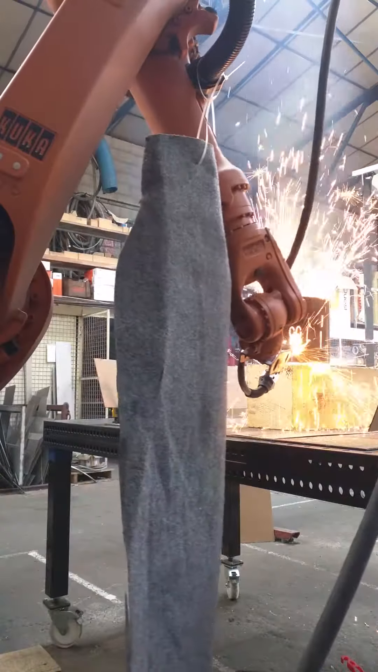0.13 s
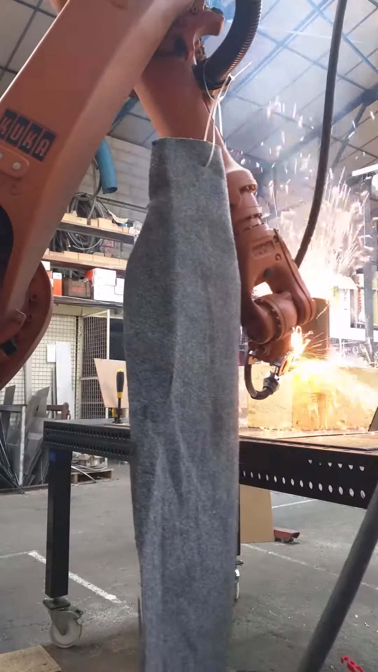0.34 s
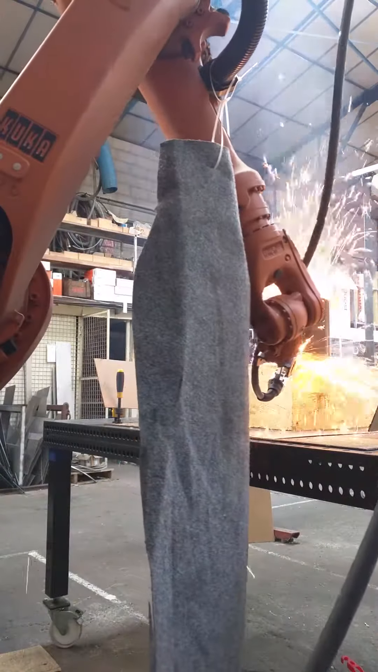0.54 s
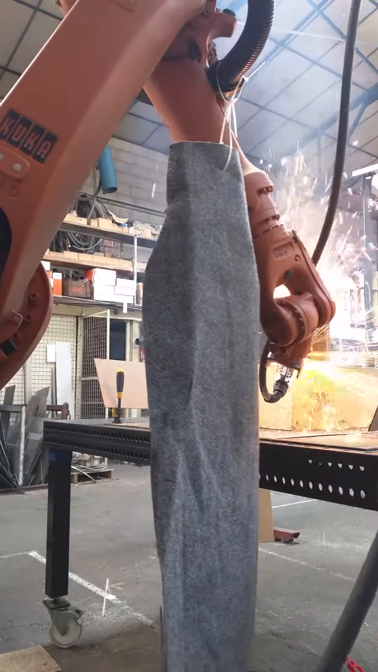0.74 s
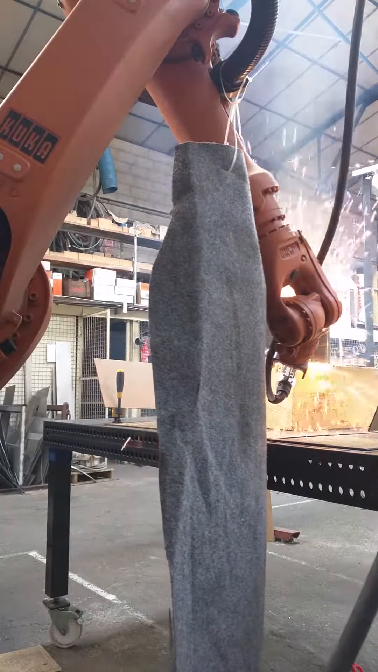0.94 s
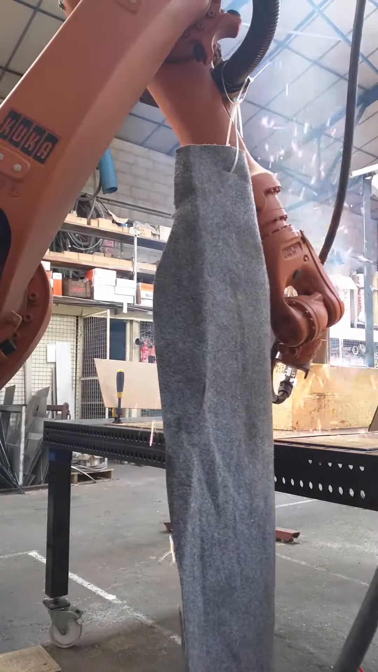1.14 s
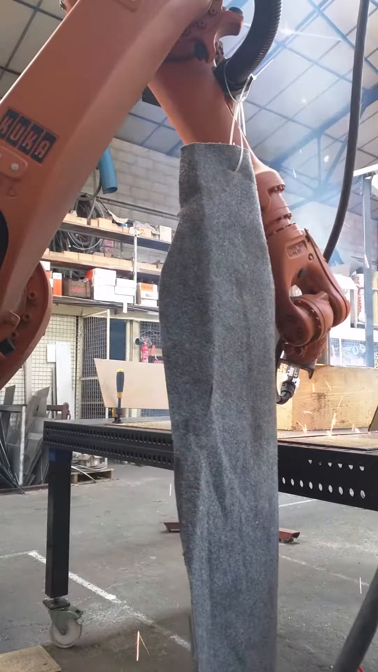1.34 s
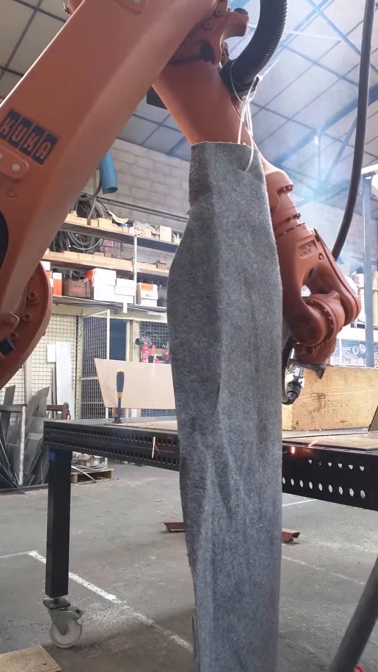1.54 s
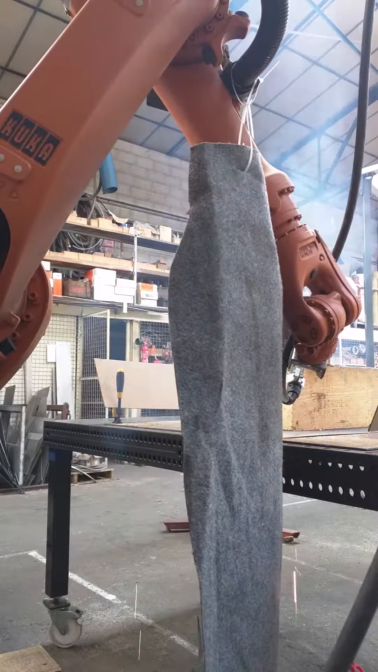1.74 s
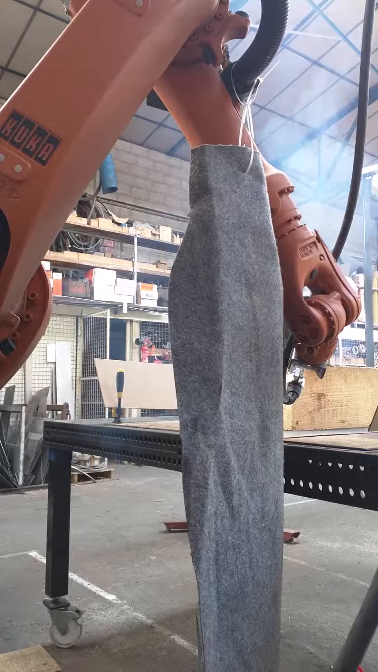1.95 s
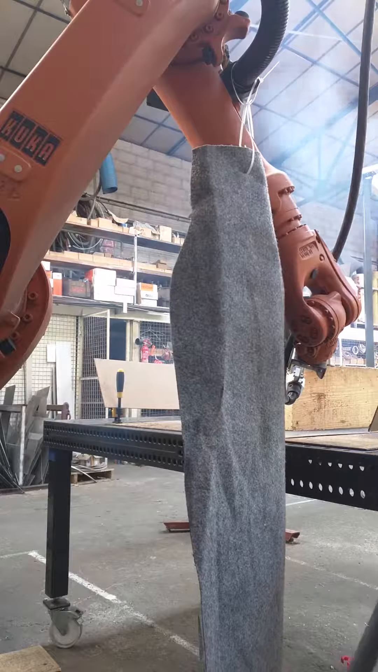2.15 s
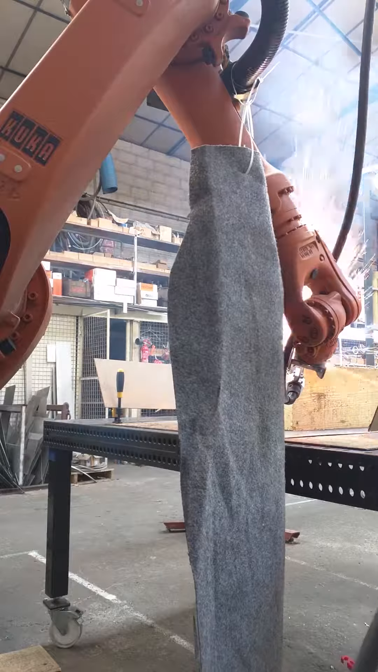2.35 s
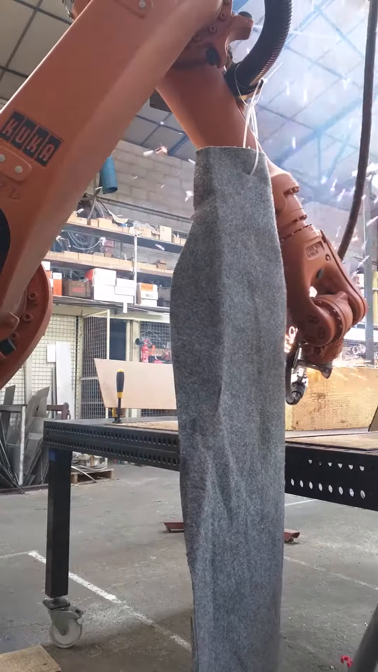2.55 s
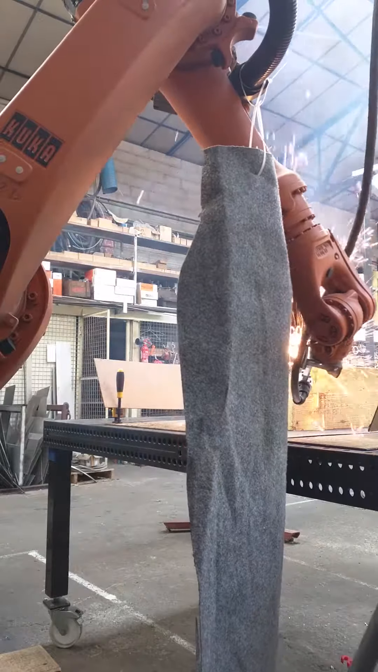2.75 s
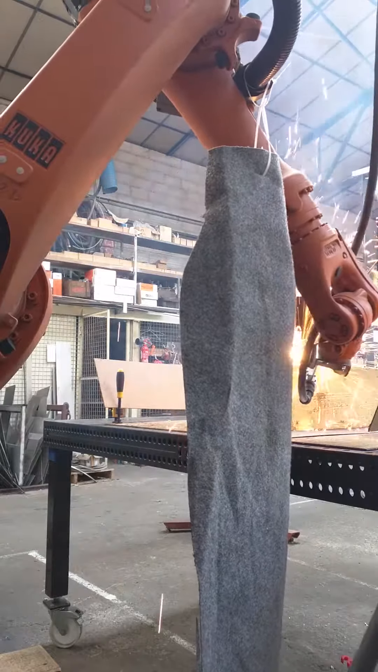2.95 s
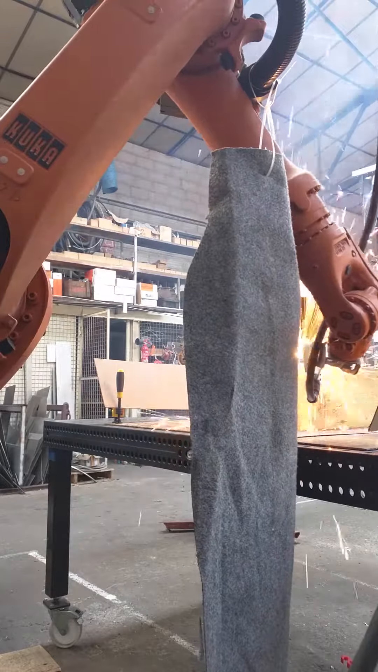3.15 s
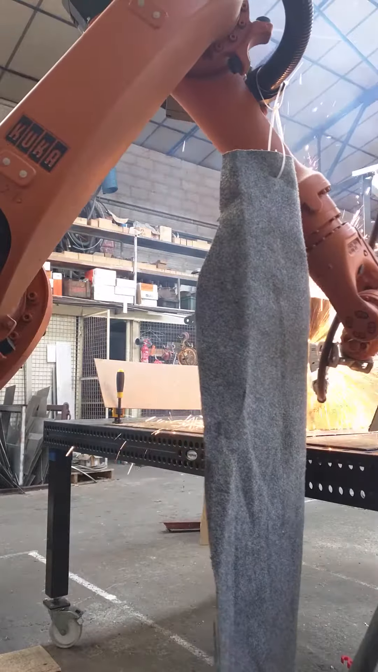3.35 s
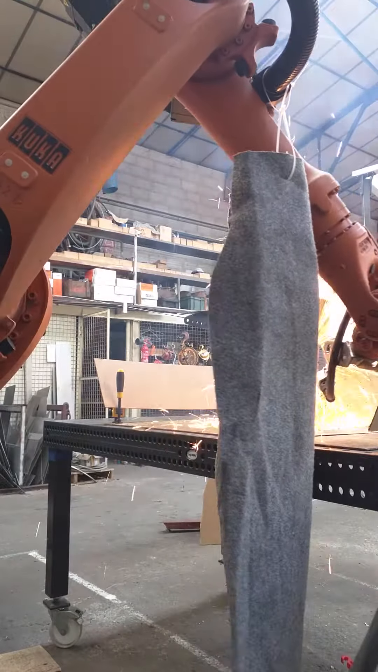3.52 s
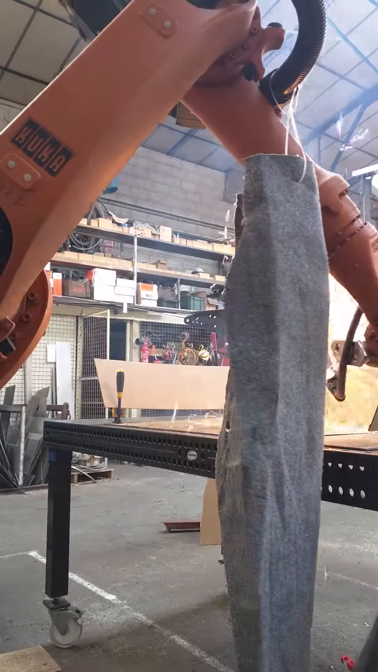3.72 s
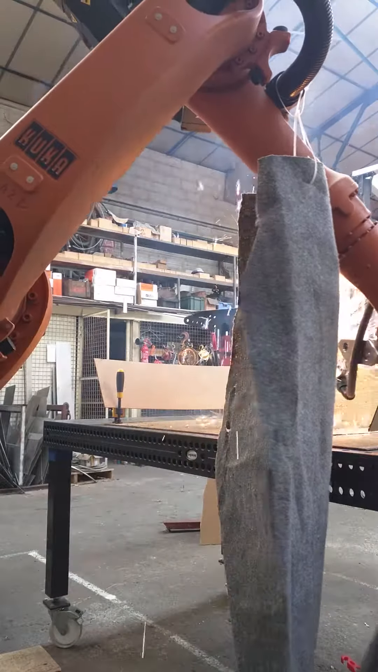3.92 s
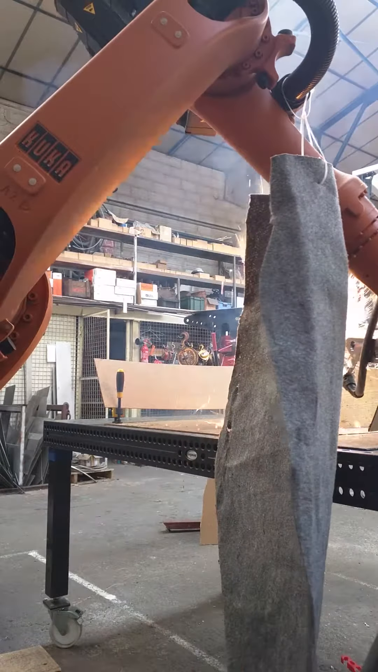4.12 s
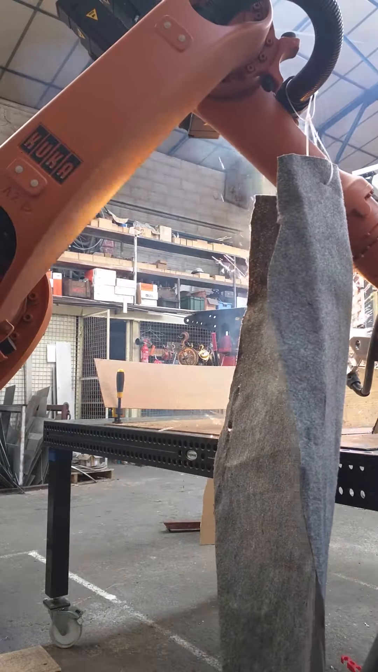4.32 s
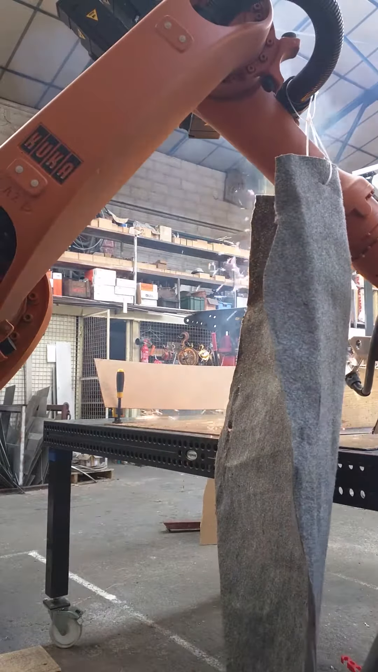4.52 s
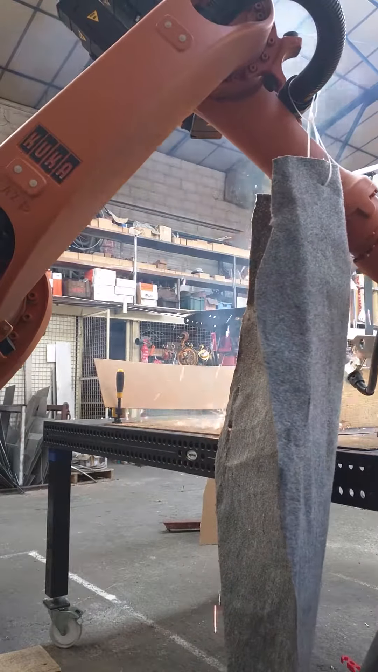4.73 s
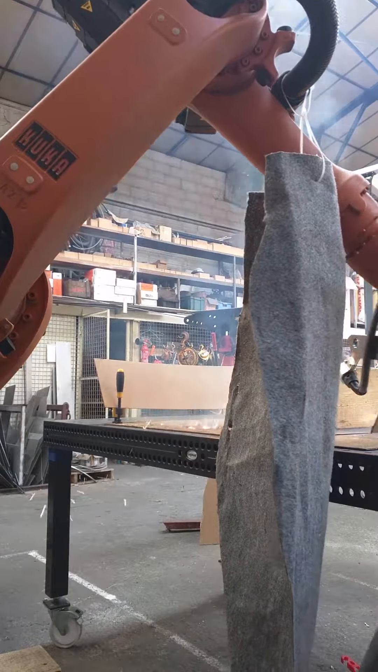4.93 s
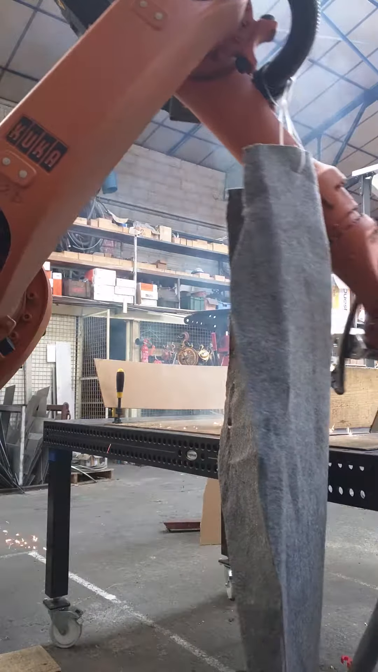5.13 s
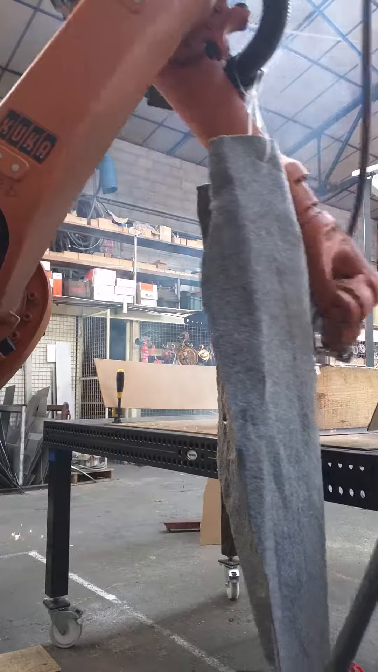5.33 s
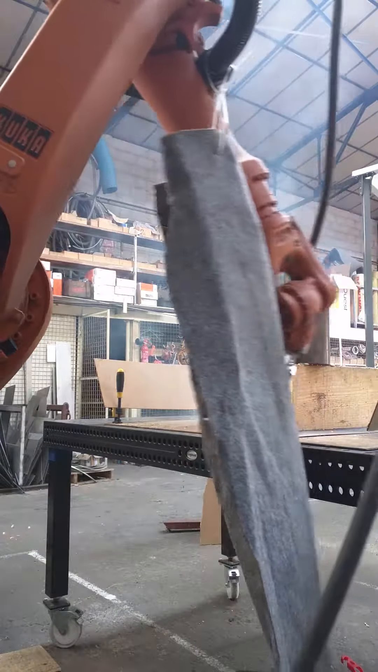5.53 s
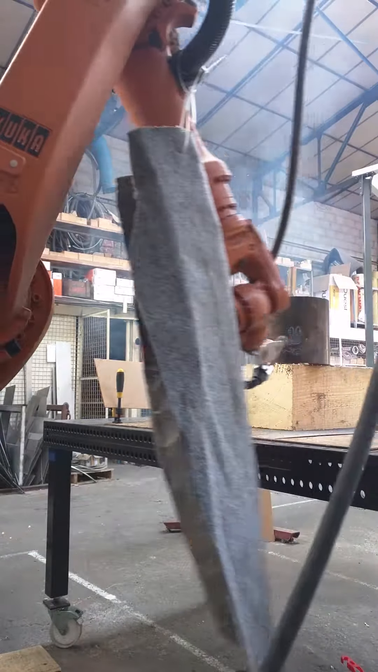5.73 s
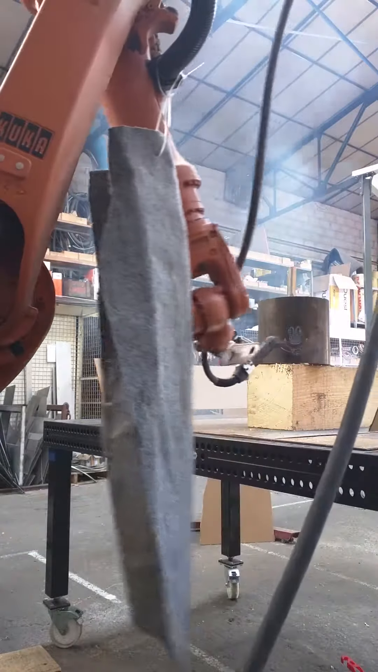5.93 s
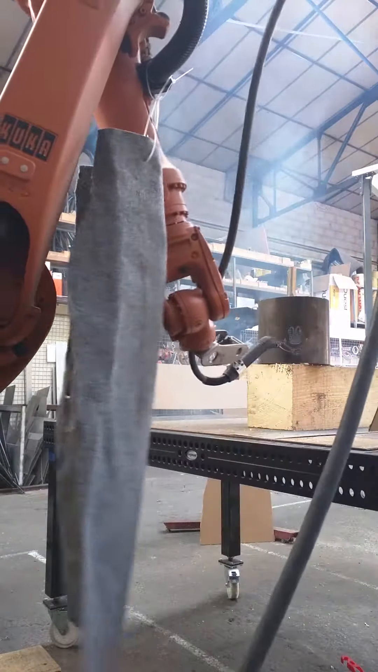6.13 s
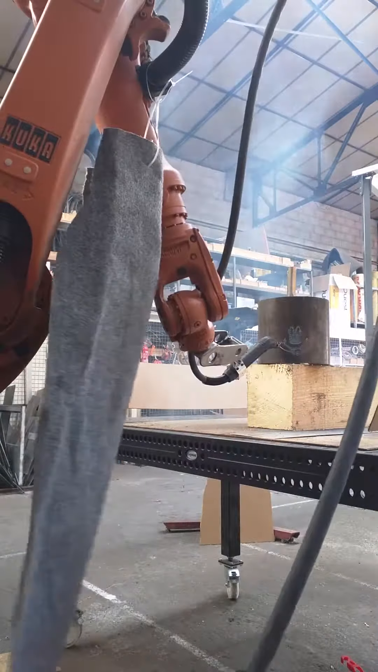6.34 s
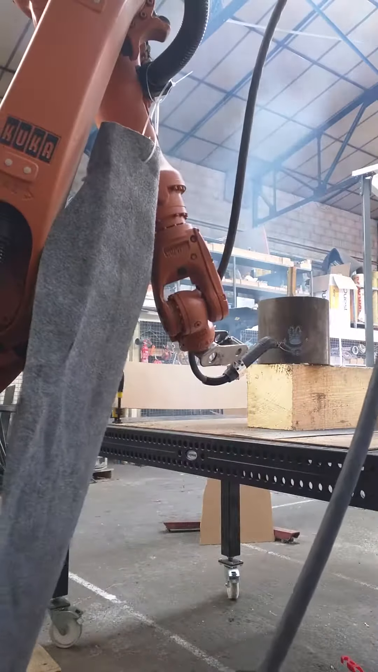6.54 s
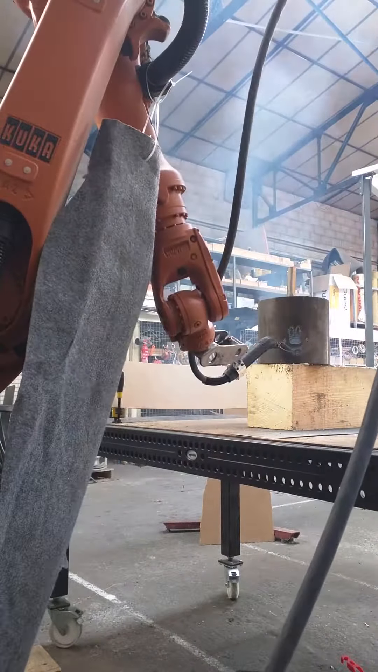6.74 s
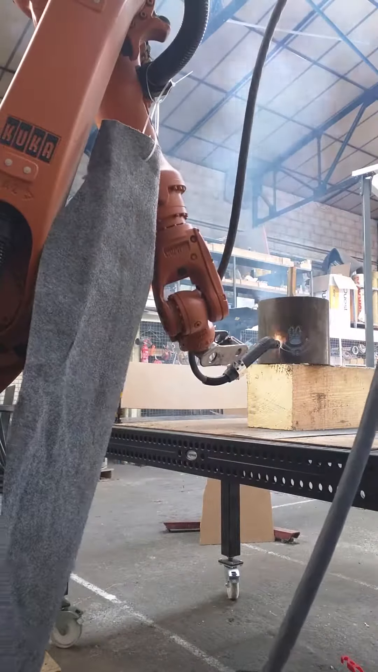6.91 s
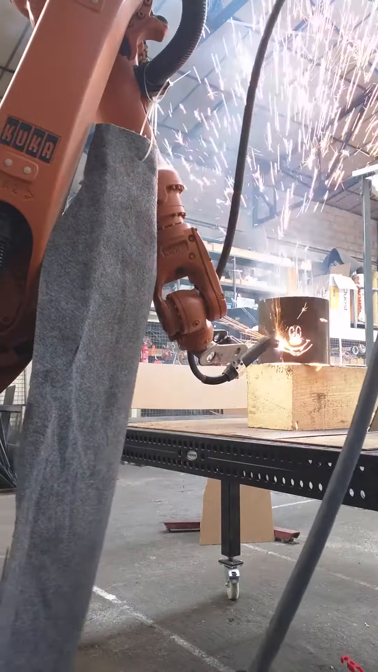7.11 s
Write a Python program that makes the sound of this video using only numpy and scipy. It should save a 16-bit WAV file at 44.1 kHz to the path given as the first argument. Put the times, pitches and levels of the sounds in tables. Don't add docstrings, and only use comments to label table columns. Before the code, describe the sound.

In a large workshop, a plasma torch on a robot arm cuts steel pipe with a loud, bright hiss and a hollow roar. A sharp pop ends the roar, the gas hisses on, then shuts and the hall rings out. It bursts back for a longer cut, pops again, then fades to gas alone before another short shut-off and return. Low machine rumble lies beneath; one phone microphone nearby.

```python
import sys
import numpy as np
from scipy import signal
from scipy.fft import rfft, irfft, next_fast_len
from scipy.io import wavfile
from scipy.ndimage import uniform_filter1d, map_coordinates

SR = 44100
rng = np.random.default_rng(int(sys.argv[2]) if len(sys.argv) > 2 else 0)


def unload_wav(signal):
    wavfile.write(
        sys.argv[1],
        SR,
        np.round(np.clip(np.atleast_2d(signal).T, -1, 1) * 32767).astype(np.int16),
    )


def elevation(decibels):
    levels = np.asarray(decibels, float)
    return 10 ** (levels / 20)


N = 320607
TIME = np.arange(N) / SR


def unit(x):
    return x / np.sqrt(np.mean(x ** 2) + 1e-20)


def along(points, hz):
    f, v = np.transpose(points)
    return np.interp(np.log(hz + 1), np.log(f + 1), v)


def curves(rows, t=TIME):
    s, *cols = np.transpose(rows)
    return [np.interp(t, s, c) for c in cols]


def bump(t, centre_s, length_s, power=2):
    return np.exp(-((t - centre_s) / length_s) ** power)


def wobble(rate):
    knots = rng.standard_normal(int(N * rate / SR) + 4)
    return map_coordinates(knots, [np.arange(N) * rate / SR])


def filtered(x, response):
    m = next_fast_len(N + SR // 2)
    return irfft(rfft(x, m) * response(np.fft.rfftfreq(m, 1 / SR)), m)[..., :N]


def lifts(modes, hz):
    return elevation(sum(db / (1 + (2 * (hz - c) / w) ** 2) for c, w, db in modes))


def band(hz, low_hz, high_hz, order=4):
    low_edge = 1 + (low_hz / (hz + 1)) ** (2 * order)
    high_edge = 1 + (hz / high_hz) ** (2 * order)
    return 1 / np.sqrt(low_edge * high_edge)


def narrow(centre_hz, width_hz):
    skirt = lambda hz: 1 / (1 + (2 * hz / width_hz) ** 2) ** 0.57
    re, im = filtered(rng.standard_normal((2, N)), skirt)
    turn = 2 * np.pi * np.cumsum(np.broadcast_to(centre_hz, N)) / SR
    return unit(re * np.cos(turn) + im * np.sin(turn))


def rush(comb_db, patchy_db):
    z = signal.stft(rng.standard_normal(N + SR), nperseg=2048)[2]

    def blur(rows, cols):
        grain = uniform_filter1d(rng.standard_normal(z.shape), rows, 0)
        return unit(uniform_filter1d(grain, cols, 1))

    gain_db = comb_db * blur(3, 20) + patchy_db * blur(30, 4)
    return signal.istft(z * elevation(gain_db), nperseg=2048)[1][:N]


# (shuts [s], opens [s], arc strikes [s], burst before the strike [dB])
VALVE = [
    (2.025, 2.46, 2.555, 1.5),
    (6.669, 7.104, 7.198, 2.5),
]
OPEN_S, SETTLE_S = 0.0094, 0.014


def valve(level_db, t, fall, floor_db, fill_db, fill_s):
    drain_s, drain_soft_s = 0.078, 0.1
    hinge = lambda v: (v + np.hypot(v, drain_soft_s)) / 2
    for shut, opens, *_ in VALVE:
        out_db = fall * (hinge(np.maximum(t - shut, 0) - drain_s) - hinge(-drain_s))
        shut_db = 10 * np.log10(elevation(2 * (level_db - out_db)) + elevation(2 * floor_db))
        closed = np.clip((opens - t) / OPEN_S, 0, 1) * (t > shut)
        returning = (t > opens - OPEN_S) * (1 - closed)
        missing_db = returning * fill_db * np.exp(-abs(t - opens) / fill_s)
        level_db = level_db + closed * (shut_db - level_db) - missing_db
    return level_db


def unlit(t, opens, strike):
    return (t > opens - OPEN_S) * np.clip((strike - t) / SETTLE_S + 1, 0, 1)


# (time [s], flow [dB], brightness [dB])
JET_PATH = [(0, .4, 0.9), (.79, 0.1, -0.5), (1.16, 0.5, -0.5), (1.49, -1.5, -1.5), (1.86, -3, -0.3),
            (1.97, -.6, 1.5), (2.7, 1.5, -1), (2.97, 1.1, -0.2), (3.23, -0.1, -0.6), (3.6, -0.5, 0),
            (4.3, -1, 1.2), (4.66, 0, 0.4), (5.4, -0.6, 0.5), (5.78, -5, 0), (5.87, -1, 2), (6.05, -0.4, 0),
            (6.65, -.5, 0.6), (7.27, 1, 0.1)]
# (time [s], length [s], flow [dB], brightness [dB])
GUSTS = [(0.34, .06, 1, 0.5), (.46, 0.044, -0.5, 0), (1.0, 0.1, -1, -0.5), (2.79, 0.072, -2, 1.5),
         (4.89, .08, 2, -2), (6.04, .04, 1, 0), (5.332, 0.038, 0.5, -0.5), (5.488, 0.025, 1, 2),
         (5.948, .03, -1.5, -1.5), (2.68, .04, 1, 1.5), (8.6, .03, 2.1, -3), (0.17, 0.036, -0.3, -1),
         (3.8, 0.088, -.8, -.8), (6.9, .04, -.4, .8), (1.27, 0.023, 1.3, -1), (5.08, 0.042, 0, 0),
         (5.57, .04, -0.2, -.5), (.58, .05, 1, 0), (6.75, 0.039, 0.5, 0)]
# (time [s], depth [dB], recovery [s])
DIPS = [
    (1.21, 3, .05),
    (2.575, 3, 0.046),
    (4.68, 4, 0.044),
    (7.22, 5, 0.033),
]
# (level [dB], share of brightness, ring-out [dB/s], floor [dB], build-up [dB], share of burst)
JET_PARTS = [
    (-26, -1.24, 62, -58, 2.5, 0.19),
    (-23.5, -0.59, 65, -66, 1.5, .5),
    (-21, 1.13, 107, -49, 1, 1.6),
    (-21.5, 1.2, 151, -63, 1, 1.9),
]


def jet_levels(t):
    flow_db, bright_db = curves(JET_PATH, t)
    for at, length, db, tilt_db in GUSTS:
        gust = bump(t, at, length)
        flow_db, bright_db = flow_db + db * gust, bright_db + tilt_db * gust
    for at, db, back in DIPS:
        onset = np.clip((t - at) / OPEN_S + 1, 0, 1)
        flow_db = flow_db - db * onset * np.exp(-np.maximum(t - at, 0) / back)
    burst_db = sum(db * unlit(t, opens, strike) for _, opens, strike, db in VALVE)
    return [valve(db + flow_db + tilt * bright_db, t, fall, floor_db, fill_db, fill_s=0.11) + burst * burst_db
            for db, tilt, fall, floor_db, fill_db, burst in JET_PARTS]


# (frequency [Hz], density [dB per Hz])
SHADED_COLOUR = [(1500, -16), (2500, 2), (3500, 2.5), (4900, 0.5), (7100, -2), (9000, -1.5), (11200, -2),
                 (12400, -3.5), (13600, -3), (15000, -5.5), (16500, -11)]
# (frequency [Hz], density [dB per Hz])
OPEN_COLOUR = [(1500, -14), (2500, -8), (3500, -7), (4900, -5), (7100, -8), (9000, -5.5), (10800, -6.5),
               (11500, -1), (12850, 4.5), (13150, -8), (15000, 3), (16500, -13)]
# (frequency [Hz], width [Hz], lift [dB])
NOZZLE = [(3820, 120, 4), (4570, 130, 2.5), (4870, 490, 3), (6230, 290, 2.5), (10120, 170, 3),
          (12050, 39, 9), (13400, 130, -2), (15300, 130, 6.5)]
# (time [s], share [0-1])
IN_VIEW = [(0, .1), (2.4, .05), (2.46, .6), (2.65, .4), (2.9, .2), (4, .35), (5.8, .25), (5.88, .8),
           (6.75, .8), (6.9, .1), (7.08, .1), (7.1, .95), (7.27, .9)]
# (low edge [Hz], high edge [Hz])
RANGES = [
    (2500, 5300),
    (5300, 8500),
    (8500, 12000),
    (12000, 15800),
]
# (time [s], level [dB], length [ms], top [Hz])
PUFFS = [
    (2.434, -39, 13, 15500),
    (7.08, -41, 14, 15500),
]


def jet():
    air = rush(comb_db=2.5, patchy_db=0.0)
    seen = np.clip(curves(IN_VIEW)[0], 0, 1)

    def coloured(colour):
        response = lambda hz: elevation(along(colour, hz)) * lifts(NOZZLE, hz) * band(hz, 2690, 2e4, order=9)
        return unit(filtered(air, response))

    mixed = (1 - seen) * coloured(SHADED_COLOUR) + seen * coloured(OPEN_COLOUR)
    hz, t, z = signal.stft(mixed, SR, nperseg=256, noverlap=192)
    power = uniform_filter1d(abs(z) ** 2, size=250, axis=1)
    have_db = [10 * np.log10(power[(hz > lo) & (hz < hi)].sum(0) * 4 / 3) for lo, hi in RANGES]
    gain_db = np.array(jet_levels(t)) - have_db
    top_db = gain_db[3] + 0.49 * np.minimum(gain_db[3] - gain_db[2], 0)
    gain_db = np.vstack([gain_db, top_db])
    share = np.array([np.interp(hz, [3840, 6400, 10440, 13400, 16000], row) for row in np.eye(5)])
    flow = signal.istft(z * elevation(share.T @ gain_db), SR, nperseg=256, noverlap=192)[1][:N]
    spurts = 0
    for s, db, ms, top_hz in PUFFS:
        puff = unit(filtered(air, lambda hz: band(hz, 2300, top_hz, order=8)))
        spurts = spurts + elevation(db) * bump(TIME, s, ms / 1e3, 4) * puff
    return elevation(0.48 * wobble(14)) * flow + spurts


# (time [s], length [ms], low mode [dB], high mode [dB])
SQUEALS = [
    (1.408, 12, -27, -24),
    (1.62, 140, -36, -41),
    (2.55, 100, -35, -37),
    (6.35, 330, -39, -39),
    (7.19, 85, -32, -36),
]


def squeals():
    low, high = narrow(3870, width_hz=110), narrow(4570, width_hz=140)
    return sum(bump(TIME, s, ms / 1e3, 4) * (elevation(low_db) * low + elevation(high_db) * high)
               for s, ms, low_db, high_db in SQUEALS)


# (time [s], strength [dB], brightness [dB], lift of the moving mode [dB])
ARC = [(0, -2, 0.5, 4.5), (1.07, 0.5, 0.5, 0.5), (1.3, -4, 4, -6), (1.45, -8, 2.3, -3),
       (2.0, -11.5, 1.5, -4), (2.5, -10.5, 0, -0.5), (2.72, -6.5, 1, -2.5), (3.09, 0.5, 3, -6),
       (3.44, .5, 1, 1.8), (3.83, -1.3, -1, -4.5), (4.2, -0.5, -4.5, 0), (4.58, -4.5, -5, 4),
       (4.75, -2, -2.5, -1), (4.98, -11.5, -1.5, 5), (5.4, -9, 0, 1.5), (5.85, -11, -1.3, 0),
       (6.4, -12, 3.5, -3), (7.2, -12, -1, 3.5)]
# (level [dB], growth with strength, share of brightness, ring-out [dB/s], floor [dB], build-up [dB])
PIPE_PARTS = [
    (-39, 1.05, -0.55, 90, -63, 3),
    (-32.5, 1.03, -0.079, 100, -65, 1),
    (-31, 1.18, 0.35, 51, -62, -7),
    (-29.5, 0.69, 0.75, 65, -55, 0),
]
# (frequency [Hz], density [dB per Hz])
PIPE_COLOUR = [(53, -46), (90, -13), (238, -11), (280, -16.5), (395, -4.5), (473, -11.5), (591, -5.5),
               (1060, -7), (1490, -8.5), (3200, -14.5), (4160, -38), (7040, -120)]
# (frequency [Hz], width [Hz], lift [dB])
PIPE_MODES = [(245.4, 18, 5.5), (406, 83, 1.5), (522, 15, 10.5), (585, 70, 9.5), (765, 126, 8.5),
              (1487, 110, 7), (1815, 34, 6), (2173, 250, 4.5)]
# (time [s], centre [Hz])
RING_HZ = [(0, 1526), (1.3, 1531), (2.46, 1650), (2.9, 1492), (3.6, 1466), (3.9, 1673), (5, 1680),
           (7.27, 1596)]
# (time [s], level [dB])
BLOWN = [(0, -38), (.57, -34), (1.0, -37), (1.3, -43), (1.6, -35), (1.7, -42), (2.0, -36), (2.58, -32),
         (2.72, -45), (2.87, -34.5), (3.34, -31.5), (3.67, -39.5), (4.63, -44.5), (4.95, -51), (5.69, -41),
         (6.0, -38), (6.6, -39), (7.25, -39.5)]


def pipe():
    strength_db, bright_db, lift_db = curves(ARC)
    boom_db, roar_db, ring_db, wall_db = (
        valve(db + grows * strength_db + tilt * bright_db, TIME, fall, floor_db, fill_db, fill_s=0.024)
        for db, grows, tilt, fall, floor_db, fill_db in PIPE_PARTS)
    arc = rush(comb_db=1.56, patchy_db=0.5) * elevation(1.2 * wobble(40))

    def part(lo, hi):
        response = lambda hz: elevation(along(PIPE_COLOUR, hz)) * lifts(PIPE_MODES, hz) * band(hz, lo, hi, order=9)
        return unit(filtered(arc, response))

    ring = 0.73 * narrow(curves(RING_HZ)[0], width_hz=75) + 0.44 * part(1240, 1770)
    cold = sum(unlit(TIME, opens, strike) for _, opens, strike, _ in VALVE)
    boom = elevation(boom_db - 9 * cold) * part(88, 450)
    roar = elevation(roar_db - 2 * cold) * part(466, 1040)
    blown_db = valve(curves(BLOWN)[0], TIME, fall=123, floor_db=-61, fill_db=27, fill_s=0.049)
    whistle = elevation(blown_db) * narrow(1260, width_hz=47)
    half_s = 0.046 / 2
    leak = sum(bump(TIME, opens - half_s, half_s, 4) for _, opens, *_ in VALVE)
    hose = unit(filtered(arc, lambda hz: band(hz, 140, 1100) / np.sqrt(hz + 1)))
    wall = elevation(wall_db) * part(1816, 2900)
    return boom + roar + elevation(-48) * leak * hose + whistle + elevation(ring_db + lift_db) * ring + wall


# (frequency [Hz], time to fall 60 dB [s])
HALL = [(100, 0.89), (600, 0.33), (2500, 0.91), (8000, 0.52)]


def hall(x):
    hz, t, z = signal.stft(rng.standard_normal(SR), SR, nperseg=256)
    decay = elevation(-60 * t / along(HALL, hz)[:, None])
    build = 1 - np.exp(-(t / 0.057) ** 2)
    tail = signal.istft(z * decay * build, SR, nperseg=256)[1]
    return signal.fftconvolve(x, tail / np.linalg.norm(tail))[:SR]


# (time [s], peak [dB], push length [ms], pipe ring [dB], hall [dB])
POPS = [
    (1.199, -10.5, 0.8, 5.5, 1.5),
    (2.032, -18.5, 0.8, -6, -2),
    (2.575, -27, 0.48, 9, -4.5),
    (2.931, -26, 0.34, 12, -17),
    (4.666, -16.5, 0.94, 8.5, 1),
    (5.37, -30, 1.2, -3, 1),
    (5.59, -32, .8, 7, 0),
    (6.678, -20.5, 0.94, -13, 0),
    (7.205, -30, 1.12, 10, -3),
]
# (frequency [Hz], level [dB])
KNOCK = [(400, -11), (590, 2.5), (760, -7), (1000, -7), (1270, -4), (1560, 2.5), (2150, 3.5)]
# (delay [ms], level [dB])
ECHOES = [(5.6, -2), (35, -8), (58, -11)]


def pops():
    out, t = np.zeros(N + SR), np.arange(SR) / SR
    for s, db, ms, ring_db, hall_db in POPS:
        u = t / (ms / 1e3) - 1.5
        push = 0.8 * (u + 0.3) * np.exp(-u * u)
        ring = 0
        for k, (hz, level) in enumerate(KNOCK):
            mode_db = level + ring_db - 12 + rng.normal(0, 1) - 60 * t * hz / 24
            ring = ring + elevation(mode_db) * np.sin(-(-1) ** k * 2 * np.pi * hz * t)
        direct = push + np.roll(ring, round(ms * 0.00129 * SR))
        walls = sum(elevation(e_db) * np.roll(direct, round(e_ms * SR / 1e3)) for e_ms, e_db in ECHOES)
        i = round((s - ms / 1e3) * SR)
        tail = elevation(hall_db + 1) * hall(direct[:SR // 10])
        out[i:i + SR] += elevation(db) * (direct + walls * elevation(ring_db / 3) + tail)
    return signal.lfilter(*signal.butter(2, 70, 'high', fs=SR), out[:N])


# (frequency [Hz], density [dB per Hz])
RUMBLE = [(12, -40), (20, -17), (38, -1), (59, -1.5), (106, -11.5), (124, -23), (155, -15), (300, -27.5),
          (390, -49), (660, -120)]
# (frequency [Hz], level [dB])
HUM = [(50, -54), (100, -61), (505, -60.5)]
# (time [s], length [s], level [dB])
MOVES = [(0.697, .25, -52), (1.2, .1, -53), (2.05, .1, -46), (2.37, .08, -50), (3.6, .35, -51),
         (4.4, .3, -54), (5.55, .25, -42), (6.0, .12, -46), (6.3, .1, -43), (6.66, .1, -45),
         (7.035, .08, -50)]


def shop():
    rumble = unit(filtered(rng.standard_normal(N), lambda hz: elevation(along(RUMBLE, hz))))
    hum = sum(elevation(db + 3 + 2 * wobble(5)) * np.sin(2 * np.pi * hz * TIME + 0.6 * wobble(6)) for hz, db in HUM)
    drives = sum(elevation(db) * bump(TIME, s, length) for s, length, db in MOVES)
    idle = elevation(-71)
    return (idle + drives) * rumble + hum


def scene():
    mono = jet() + squeals() + pipe() + pops() + shop()
    return np.array([mono, mono])


TOP_HZ = 15830


def shimmer(mono):
    swaps_per_s, hop, start = 5.4, 1024, 700
    side = np.zeros(N)
    rise = np.cumsum(np.kaiser(hop + 1, 4 * np.pi))
    rise = np.sqrt(rise[:-1] / rise[-1])
    fade = np.concatenate([rise, rise[::-1]])
    count = round(swaps_per_s * N / SR)
    for k, (when, place, width) in enumerate(rng.random((count, 3))):
        i = start + hop * int((k + when) / count * (N // hop - 2))
        low_hz = np.interp(place, [0, 1], [4200, 14500])
        high_hz = min(low_hz + np.interp(width ** 2, [0, 1], [900, 2200]), TOP_HZ)
        bins = np.arange(round(low_hz * 2 * hop / SR), round(high_hz * 2 * hop / SR))
        basis = fade * np.cos(np.pi / hop * np.outer(bins + 0.5, np.arange(2 * hop) + 0.5 + hop / 2))
        scrambled = rng.permutation(basis @ mono[i:i + 2 * hop])
        side[i:i + 2 * hop] += elevation(-2.5) * scrambled @ basis * 2 / hop
    return side


def top_cut(x):
    return signal.sosfilt(signal.butter(12, 16990, fs=SR, output="sos"), x)


def record(dry):
    dry = filtered(dry, lambda hz: hz < TOP_HZ)
    mix = dry + shimmer(dry[0]) * np.array([[1], [-1]])
    return top_cut(mix)


dry = scene()
out = record(dry)
unload_wav(out)
```